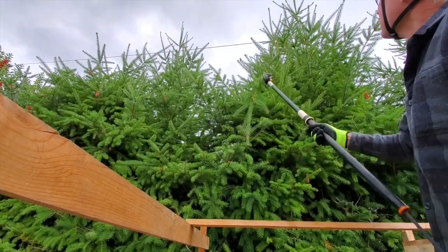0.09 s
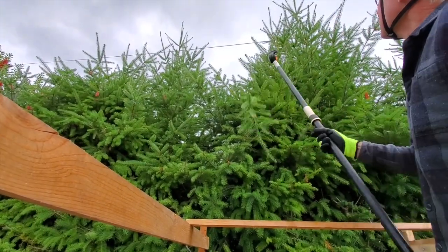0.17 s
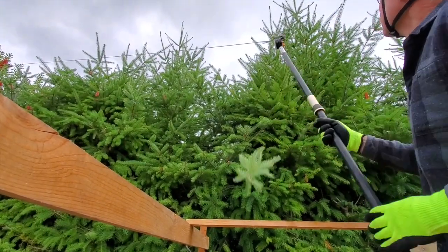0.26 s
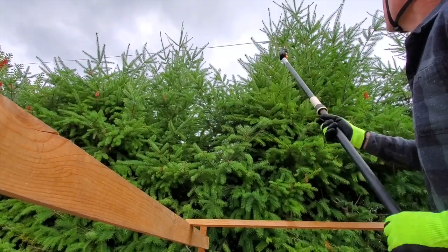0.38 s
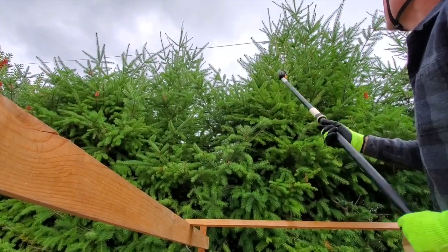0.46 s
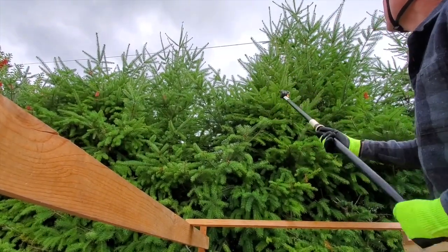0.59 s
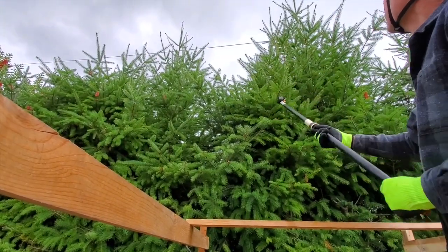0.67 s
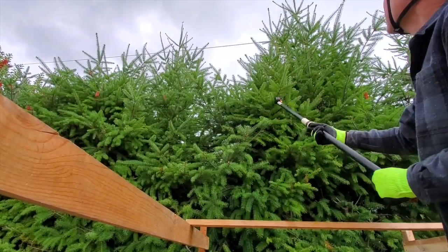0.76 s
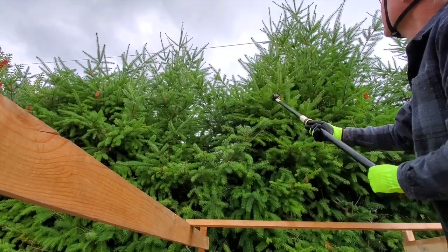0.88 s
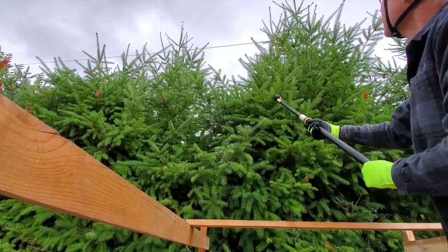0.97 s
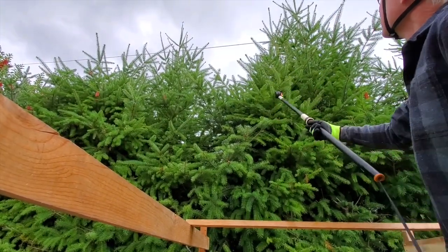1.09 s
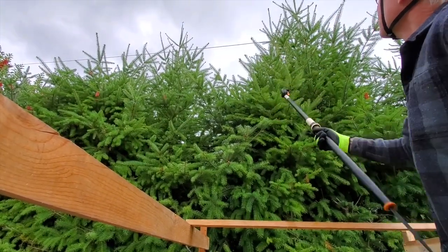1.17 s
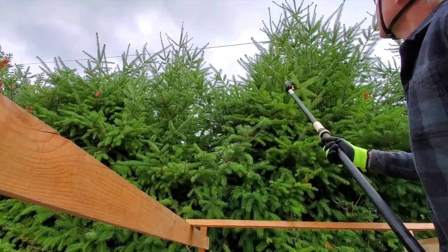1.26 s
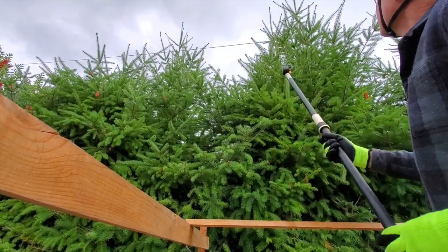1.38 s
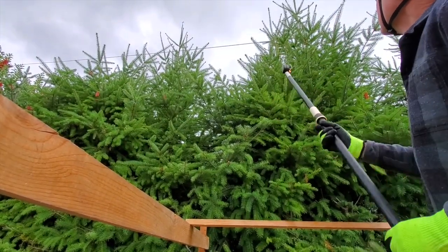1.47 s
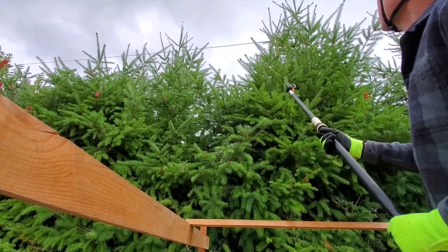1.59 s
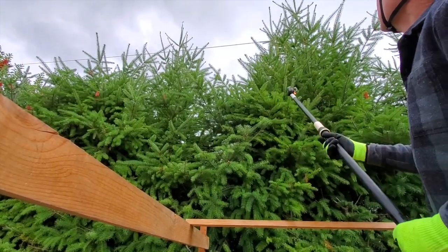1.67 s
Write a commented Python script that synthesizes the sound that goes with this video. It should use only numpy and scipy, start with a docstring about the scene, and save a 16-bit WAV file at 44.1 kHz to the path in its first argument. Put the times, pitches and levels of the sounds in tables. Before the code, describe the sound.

A pole pruner snaps sharply twice, its blade springing back with a metallic rattle, in a quiet garden

```python
"""A pole pruner works in a spruce hedge, a few metres from the microphone in a quiet garden.
Low rumble, faint hum and hiss lie behind; spruce needles brush the cutting head as coloured, grainy noise.
The blade snaps shut in bursts of noise through the head's resonances; a far bird sings gliding sine notes.
The blade springs back, rattles and rings in decaying sines; the pole gives a faint knock from its low modes.
A twig crunches in a run of short noise bursts, the blade snaps again and the pole knocks louder."""
import sys
import numpy as np
from scipy import signal
from scipy.fft import rfft, irfft
from scipy.io import wavfile

SR = 44100
rng = np.random.default_rng(int(sys.argv[2]) if len(sys.argv) > 2 else 0)


def bounce(signal):
    """Save signal as a 16-bit WAV file at the path given by the first command-line argument."""
    frames = np.transpose(np.atleast_2d(signal))
    limited = np.clip(frames, -1, 1)
    pcm = np.round(limited * 32767).astype(np.int16)
    wavfile.write(sys.argv[1], SR, pcm)


N = 74970
T = np.arange(N) / SR  # time in s
HZ = np.fft.rfftfreq(N, 1 / SR)  # frequency of each spectrum bin


def amp(db):
    """Decibels to gain."""
    return 10 ** (np.asarray(db) / 20)


def at_hz(points, hz):
    """Read a spectrum table on a log-frequency axis."""
    f, value = np.transpose(points)
    return np.interp(np.log(np.maximum(hz, 1)), np.log(f), value)


def level(rows):
    """Gain over time from a level curve in dB."""
    return amp(np.interp(T, *np.transpose(rows)))


def noise():
    """Stereo white noise; the mix of mid and side sets how alike the ears are at each frequency."""
    # How alike left and right are. Each row: frequency in Hz, correlation before limiting to 0..1.
    likeness = [(30, -4.2), (80, 1.55), (130, 0.72), (260, 0.87), (1000, 0.83), (2500, 0.1), (5000, 0.59),
                (15000, -0.02)]
    mid, side = rfft(rng.standard_normal((2, N)))
    alike = np.clip(at_hz(likeness, HZ), 0, 1)
    shared = np.sqrt((1 + alike) / 2) * mid
    opposed = np.sqrt((1 - alike) / 2) * side * [[1], [-1]]
    return irfft(shared + opposed, N)


def colour(x, gain):
    """Causal (minimum-phase) filter with the given relative gains, keeping the power of white noise."""
    cepstrum = irfft(np.log(gain / np.sqrt(np.mean(gain ** 2))), N)
    # folding the cepstrum onto positive time makes the phase minimal
    cepstrum[..., 1:N // 2] *= 2
    cepstrum[..., N // 2 + 1:] = 0
    return irfft(rfft(x) * np.exp(rfft(cepstrum)), N)


def from_head(spectrum):
    """Left and right gains of a sound that comes from the cutting head."""
    # Lean of the head between the ears. Each row: frequency in Hz, left minus right in dB.
    lean = [(300, -2.5), (2000, -2.5), (3300, -7), (4700, 3), (6500, 5.5), (8000, -3), (10000, -12.5),
            (12500, -16), (15000, -6)]
    return amp(at_hz(spectrum, HZ) + at_hz(lean, HZ) * np.array([[.5], [-.5]]))


def strike(s, t60, rise=0.000094):
    """Envelope that starts at s, with a quick linear rise and an exponential decay (times in s)."""
    age = np.maximum(T - s, 0)
    return np.minimum(age / rise, 1) * 1000. ** (-age / t60)


def bursts(rows):
    """One short burst of noise per contact, given its start, level and decay."""
    envelope = sum(amp(db) * strike(s, t60) for s, db, t60 in rows)
    return noise() * envelope


def waver(per_s):
    """Random curve that takes a new value so many times a second, with straight lines between."""
    return np.interp(T * per_s, np.arange(N), rng.standard_normal(N))


def background():
    """Distant rumble with a faint steady hum, and a soft midrange hiss, both of coloured noise."""
    # Spectra of rumble and hiss. Each row: frequency in Hz, relative density in dB per Hz.
    rumble_colour = [(20, -46.5), (40, -33), (60, -21), (78, -14), (90, -1), (105, -4), (128, 4),
                     (170, -5.5), (220, -6), (300, -13.5), (450, -17.5), (900, -43)]
    air_colour = [(150, -10), (350, 1.5), (700, -3), (1300, -5.5), (2200, -8.5), (3300, -20), (6000, -30.5),
                  (15000, -35)]
    # Their slow swells. Each row: time in seconds, level in dB.
    rumble_level = [(0, -60.5), (.07, -50), (.13, -59.5), (.2, -54), (.27, -64.5), (.45, -62.5), (.53, -55),
                    (.66, -64), (.9, -61.5), (1.11, -58.5), (1.18, -60), (1.25, -56), (1.4, -63),
                    (1.7, -62.5)]
    air_level = [(0, -65), (.2, -63), (.42, -69), (.48, -64), (.52, -55), (.6, -63), (.69, -74),
                 (.75, -63.5), (.84, -70), (1.05, -61.5), (1.27, -62), (1.48, -66.5), (1.6, -68.5),
                 (1.7, -66.5)]
    hum_hz, hum_db = 240.4, -67.5
    rumble = colour(noise(), amp(at_hz(rumble_colour, HZ))) * level(rumble_level)
    air = colour(noise(), amp(at_hz(air_colour, HZ))) * level(air_level)
    hum = amp(hum_db) * np.sin(2 * np.pi * hum_hz * T)
    return rumble + air + hum


def needles(grain_db=3.0, grains_per_s=550):
    """Fine grainy hiss of needles sliding over the head: noise whose level wavers at random."""
    # Strength of the brushing. Each row: time in seconds, level in dB before the grain.
    brush_level = [(0, -74), (.09, -69), (.2, -62), (.3, -60), (.355, -61.5), (.4, -74.5), (.45, -60.5),
                   (.6, -74), (.7, -75.5), (.76, -71.5), (.85, -80), (.95, -75), (.99, -61), (1.03, -67),
                   (1.09, -61), (1.17, -73), (1.29, -64.5), (1.38, -62), (1.465, -81), (1.5, -55.5),
                   (1.54, -70), (1.59, -75), (1.63, -67.5), (1.665, -74), (1.7, -68)]
    # Spectrum of the brushing. Each row: frequency in Hz, relative density in dB per Hz.
    brush_colour = [(2000, -15), (3500, -12), (5000, -3), (6400, 4), (8000, -0.5), (10500, -10),
                    (13200, -5.5), (16000, -19.5)]
    grain = amp(grain_db * (waver(grains_per_s) + 0.5))
    return colour(noise() * grain, from_head(brush_colour)) * level(brush_level)


def snaps():
    """Snaps and clicks of the cutter: sharp bursts through the broad resonances of the cutting head."""
    # Each row: start in seconds, level in dB, time to decay by 60 dB in seconds,
    # treble tilt in dB per octave, left minus right in dB (on top of the lean of the head).
    cuts = [(0.185, -38.5, .012, -1.5, 3.5), (0.1966, -44, 0.011, -3, 3.5), (0.2095, -63, .01, 0.5, 6),
            (0.2160, -44, .01, -9.5, 10.5), (0.2249, -8.5, 0.015, 0, -1), (0.2304, -27, 0.0056, 2, 5.5),
            (0.2399, -32, .008, -1.5, 3), (0.251, -42, .007, -5.5, -2), (1.2870, -48.5, .02, -4, -5.5),
            (1.3208, -12, 0.018, -2, -1.5), (1.3227, -12.5, 0.012, 5, 2), (1.3295, -35, 0.011, 0, 6),
            (1.3376, -36, .02, -1, 10), (1.3646, -36, 0.0052, -5.5, 11), (1.4146, -29.5, 0.027, -4, -1.5),
            (1.4222, -31.5, 0.015, -1, -1), (1.523, -58, 0.0097, -6, 1.5)]
    # Body of a snap. Each row: frequency in Hz, relative density in dB per Hz.
    body = [(40, -43.5), (110, -21.5), (300, -12), (1000, -16.5), (1600, -15.5), (2300, -16.5),
            (2900, -12.5), (3900, -16.5), (4700, 3.5), (6500, 5), (8300, -4), (10500, -7.5), (13000, -3),
            (15400, -11), (16500, -23.5)]
    # Resonances of the head. Each row: centre in Hz, width in Hz, relative left and right peaks in dB.
    resonances = [(1020, 170, -9.5, -8.5), (2810, 160, -7.5, -6.5), (3560, 240, -3.5, -0.5),
                  (4670, 290, -1.5, -2), (5250, 210, -1, -2.5), (6000, 140, 5, 1), (6540, 310, 10.5, 1.5),
                  (7750, 188, -4.5, 3), (9200, 400, 0.5, 2), (11170, 250, -13.5, 5), (13040, 500, -5, 7.5),
                  (14850, 350, 0.5, -0.5)]
    power = from_head(body) ** 2
    for hz, width, left_db, right_db in resonances:
        peak = amp([[left_db], [right_db]]) ** 2
        power = power + peak / (1 + ((HZ - hz) / width) ** 2) ** 2
    white, out = noise(), 0
    octaves = np.log2(np.maximum(HZ, 2000) / 7000)  # the tilt pivots at 7 kHz and is flat below 2 kHz
    for s, db, t60, tilt_db, pan_db in cuts:
        burst = white * strike(s, t60) * amp([[db + pan_db / 2], [db - pan_db / 2]])
        out = out + colour(burst, np.sqrt(power) * amp(tilt_db * octaves))
    return out


def bird():
    """Thin, faint notes of a far bird: sines that glide and warble, a little stronger on the right."""
    # Each row: start in seconds, length in seconds, start and end of the glide in Hz before the warble,
    # level in dB before the left-right offset.
    chirps = [(.322, 0.024, 9000, 10100, -60.5), (0.652, 0.016, 7200, 8950, -68.5),
              (0.675, 0.014, 8200, 5960, -66.5), (0.74, 0.017, 7300, 7630, -68),
              (0.749, 0.039, 9100, 7280, -66.5), (0.771, .022, 9500, 8700, -63.5),
              (1.573, 0.043, 10300, 9100, -67.5), (1.623, 0.017, 10500, 8200, -62),
              (1.678, 0.018, 8200, 10600, -67)]
    warble_hz, warble_per_s = 450, 380
    out, warble = np.zeros(N), warble_hz * waver(warble_per_s)
    for s, length, start_hz, end_hz, db in chirps:
        u = np.clip((T - s) / length, 0, 1)  # progress through the note
        pitch_hz = start_hz + (end_hz - start_hz) * u + warble
        out += amp(db) * np.sin(np.pi * u) * np.sin(2 * np.pi * np.cumsum(pitch_hz) / SR)
    return out * amp([[-2], [3]])


def rattle():
    """The blade springs back and chatters on its stop in short bursts of noise."""
    # Each row: start in seconds, level in dB, time to decay by 60 dB in seconds.
    contacts = [(0.4680, -49, 0.021), (0.4787, -30, 0.042), (0.4865, -26, 0.032), (0.4925, -30.5, 0.048),
                (0.5050, -40, 0.21), (0.5660, -52.5, 0.088)]
    # Spectrum of the chatter. Each row: frequency in Hz, relative density in dB per Hz.
    rattle_colour = [(40, -36), (150, -26), (700, -23.5), (1400, -7), (2300, -14.5), (3400, -15.5),
                     (4400, 8), (6500, 0), (8000, 0.5), (10000, -6), (11800, -11), (14000, -5),
                     (16000, -26)]
    return colour(bursts(contacts), from_head(rattle_colour))


def steel():
    """The steel's modes swell during the rattle and die away with a slight random flutter of level."""
    # Each row: mode frequency in Hz, left and right levels in dB before flutter and decay,
    # time to decay by 60 dB in seconds.
    modes = [(1222, -45.5, -43, 0.4), (1253, -52, -50, 0.36), (1526, -53, -52.5, 0.29),
             (2342, -62, -61.5, 0.39), (3963, -40, -35, 0.23), (4200, -53, -48, 0.32),
             (4573, -39, -42, 0.2), (4685, -43, -40, 0.26), (4670, -40, -32.5, 0.18),
             (5274, -38, -44, 0.22), (5443, -47, -41.5, 0.19), (5738, -44, -43, 0.13),
             (6400, -47, -35, 0.13), (6820, -40, -32.5, .12), (8380, -37, -30, 0.095), (9340, -42, -32, .1),
             (12800, -49, -26, 0.1)]
    start_s, rise_s = .4795, 0.0053
    flutter_db, flutter_per_s = 1.0, 130
    ear_spread_rad = .5  # random phase spread at each ear
    out = 0
    for hz, left_db, right_db, t60 in modes:
        phase = rng.uniform(0, 2 * np.pi) + ear_spread_rad * rng.standard_normal((2, 1))
        tone = np.sin(2 * np.pi * hz * T + phase) * strike(start_s, t60, rise_s)
        flutter = amp(flutter_db * waver(flutter_per_s))
        out = out + flutter * amp([[left_db], [right_db]]) * tone
    return out


def pole():
    """Soft blows ring the low modes of the pole, each with a dull tick; the thin tube radiates no deep bass."""
    # Hollow knocks. Each row: start in seconds, ring level in dB (added to each mode), tick level in dB.
    knocks = [(0.7360, -29, -47), (1.607, -1.5, -41), (1.6102, -4, -42)]
    # Modes of the pole. Each row: frequency in Hz, relative level in dB, time to decay by 60 dB in seconds.
    modes = [(220.5, -51, 0.22), (313, -48, 0.047), (361, -42, 0.092), (498, -45.5, 0.082),
             (660, -50, 0.043), (802, -57.5, 0.21), (984, -41.5, 0.066), (1179, -35.5, 0.035),
             (1442, -41, .025), (1750, -52, .02)]
    # Spectrum of the tick. Each row: frequency in Hz, relative density in dB per Hz.
    tick_colour = [(150, 4), (500, -2.5), (1400, -6), (2300, -21.5), (6000, -27.5), (15000, -32)]
    tick_t60_s, rise_s, low_cut_hz = 0.044, 0.00084, 175
    ticks = bursts([(s, tick_db, tick_t60_s) for s, _, tick_db in knocks])
    ring = np.zeros(N)
    for s, db, _ in knocks:
        for hz, mode_db, t60 in modes:
            ring += amp(db + mode_db) * strike(s, t60, rise_s) * np.sin(2 * np.pi * hz * (T - s))
    knocking = ring + colour(ticks, amp(at_hz(tick_colour, HZ)))
    low_cut = signal.butter(3, low_cut_hz, "high", fs=SR, output="sos")
    return signal.sosfilt(low_cut, knocking)


def twig():
    """A twig gives way fibre by fibre in a quick run of duller cracks."""
    # Each row: start in seconds, level in dB, time to decay by 60 dB in seconds.
    cracks = [(1.0990, -46, 0.044), (1.1033, -42, 0.012), (1.1068, -32.5, 0.0095), (1.1084, -32.5, 0.0079),
              (1.1098, -28.5, 0.0093), (1.1195, -28.5, 0.0081), (1.1225, -41, 0.0089), (1.1355, -47, 0.01)]
    # Spectrum of a crack. Each row: frequency in Hz, relative density in dB per Hz.
    crack_colour = [(40, -30), (120, -2.5), (300, -3), (700, -5.5), (1300, -1), (2200, -5.5), (3400, -5.5),
                    (4800, -1), (6400, 2), (8000, -8), (11000, -14.5), (13500, -13), (16000, -27)]
    return colour(bursts(cracks), from_head(crack_colour))


def scatter(x, db, t60, delay_s=.004):
    """Diffuse reflections: a decaying noise response of unit energy, different at each ear."""
    response = rng.standard_normal((2, N)) * strike(delay_s, t60)
    response /= np.sqrt(np.sum(response ** 2, axis=1, keepdims=True))
    return amp(db) * signal.fftconvolve(x, response, axes=1)[:, :N]


def scene():
    """The contacts reach the right ear first; hedge and garden scatter them and the ringing steel."""
    left_lag_s = .00011
    left, right = snaps() + rattle() + pole() + twig()
    near = np.array([np.interp(T - left_lag_s, T, left), right]) + steel()
    hedge = scatter(near, db=-10, t60=0.12)
    garden = scatter(near, db=-35, t60=0.15)
    return near + hedge + garden + needles() + bird() + background()


def record(dry):
    """The top is cut steeply by an elliptic low-pass."""
    cutoff_hz = 16750
    top_cut = signal.ellip(10, .2, 80, cutoff_hz, fs=SR, output="sos")
    return signal.sosfilt(top_cut, dry)


dry = scene()
out = record(dry)
bounce(out)
```